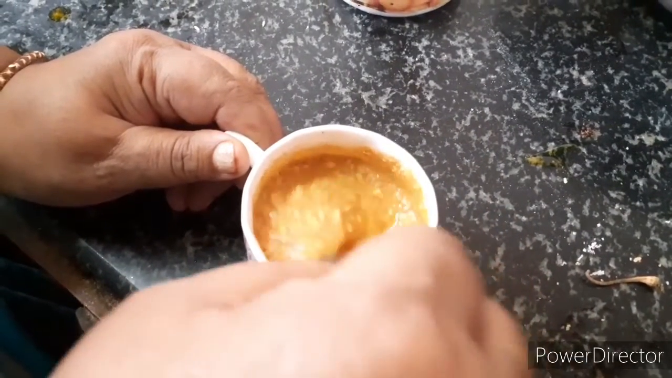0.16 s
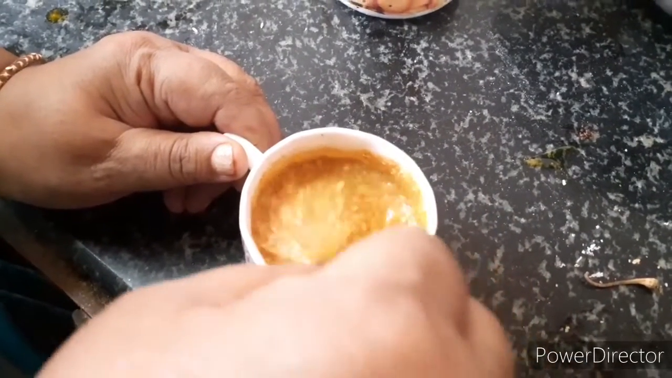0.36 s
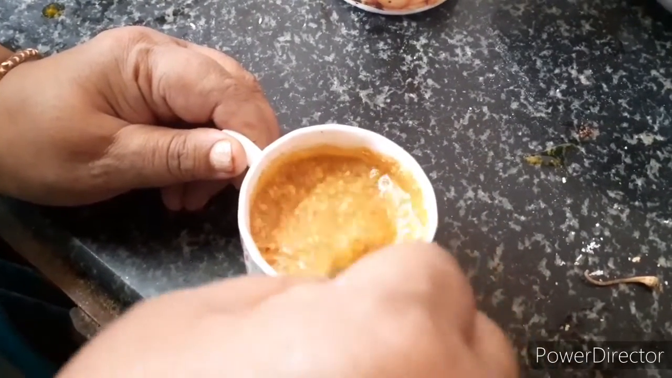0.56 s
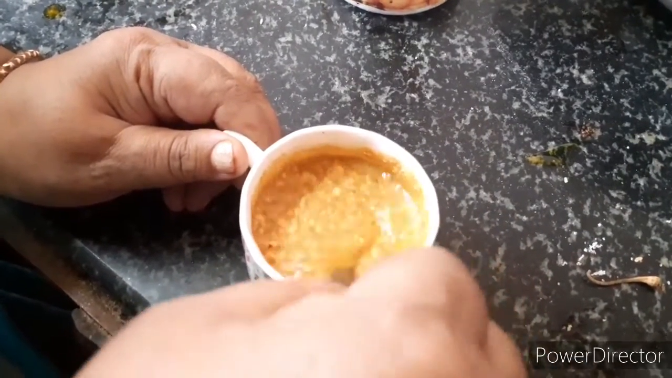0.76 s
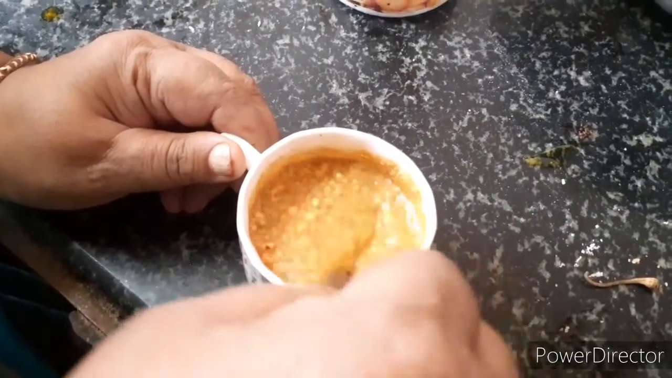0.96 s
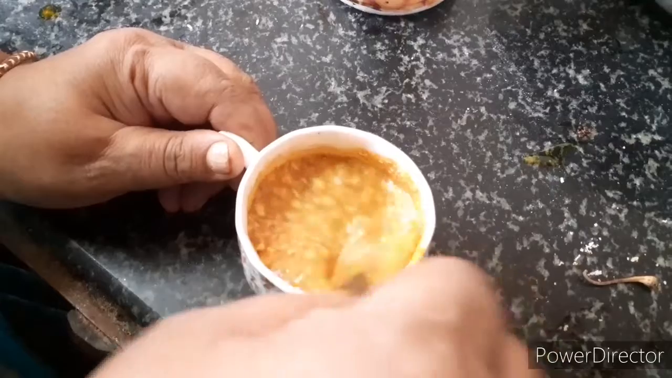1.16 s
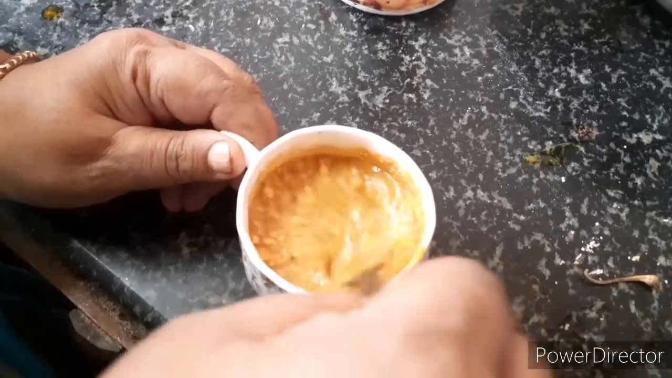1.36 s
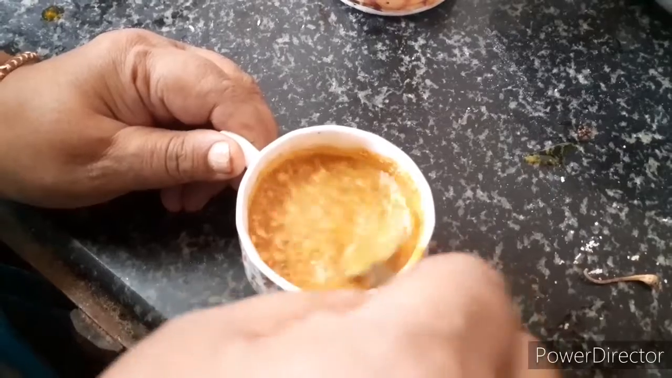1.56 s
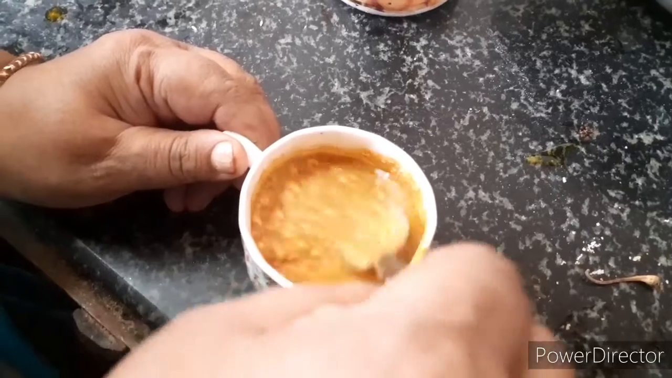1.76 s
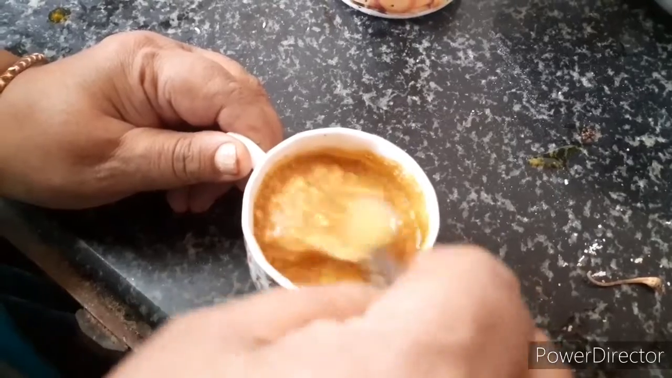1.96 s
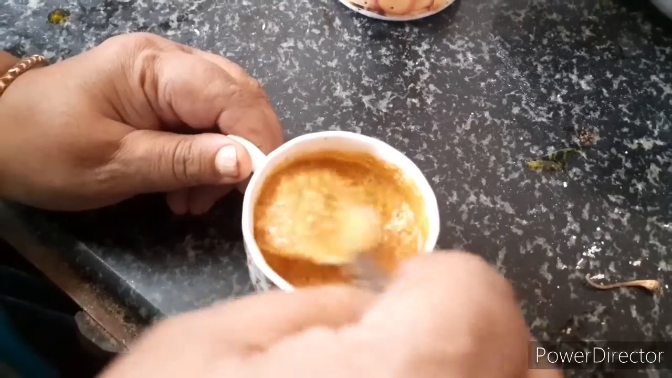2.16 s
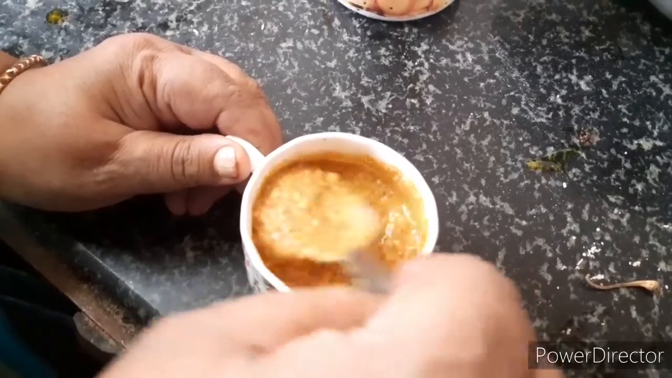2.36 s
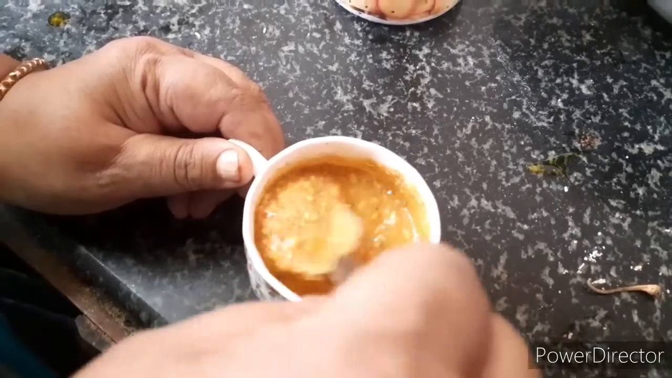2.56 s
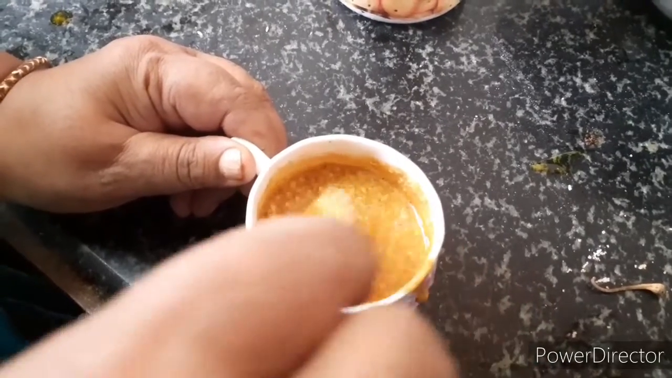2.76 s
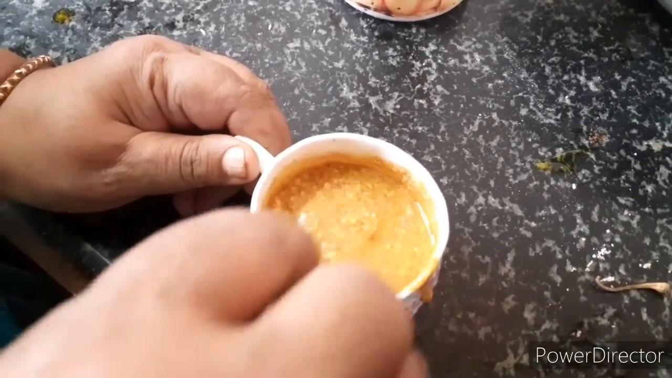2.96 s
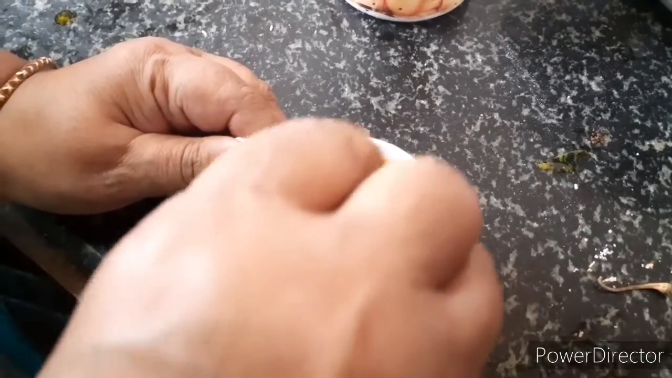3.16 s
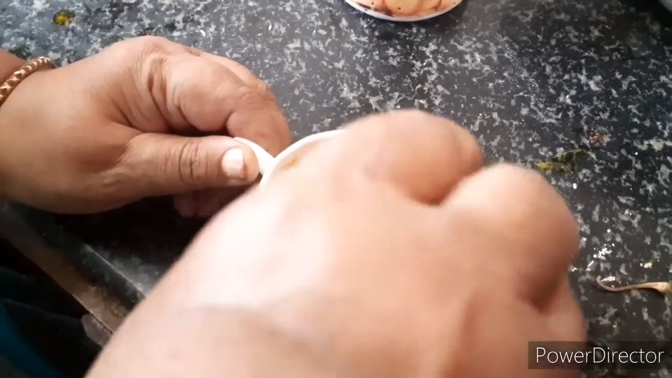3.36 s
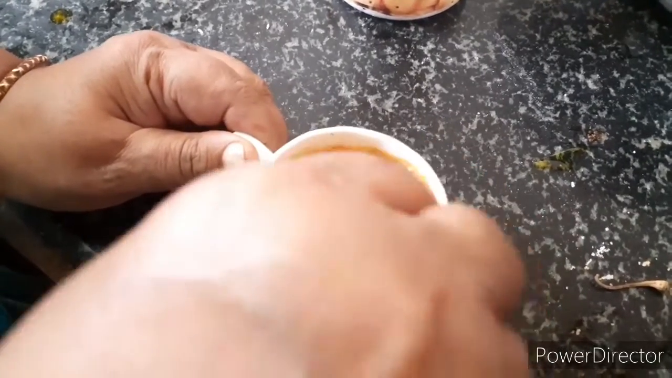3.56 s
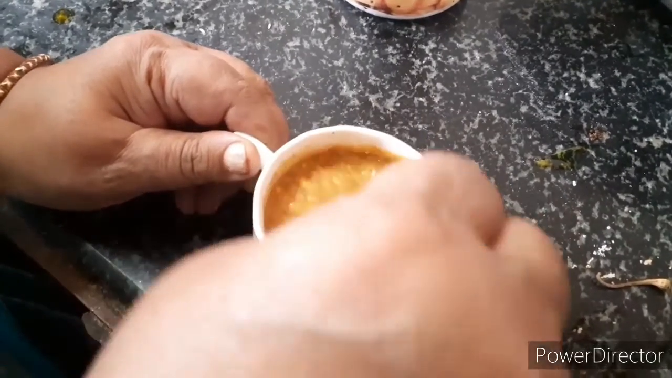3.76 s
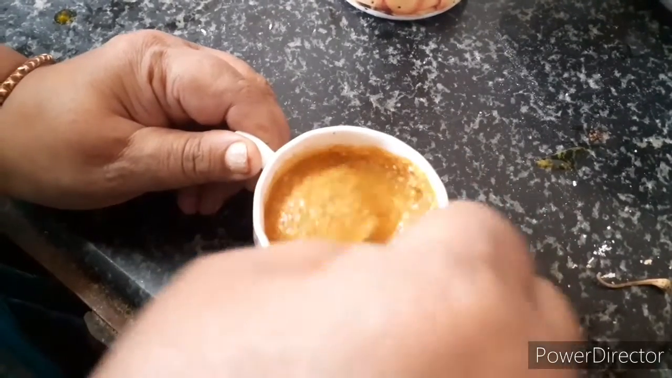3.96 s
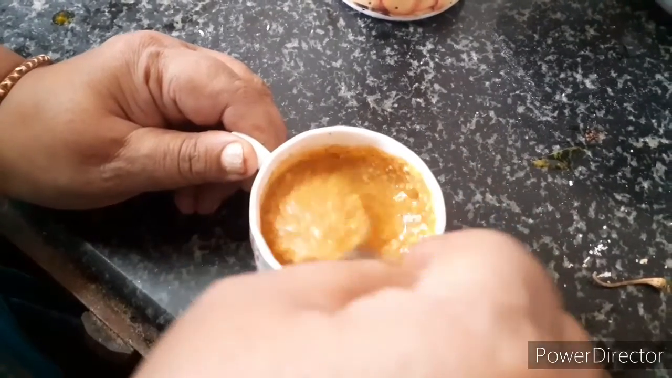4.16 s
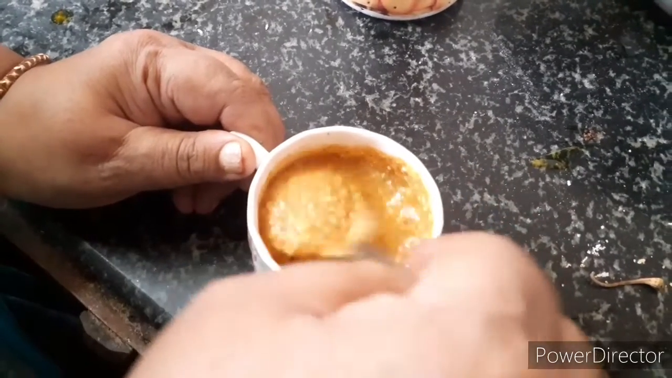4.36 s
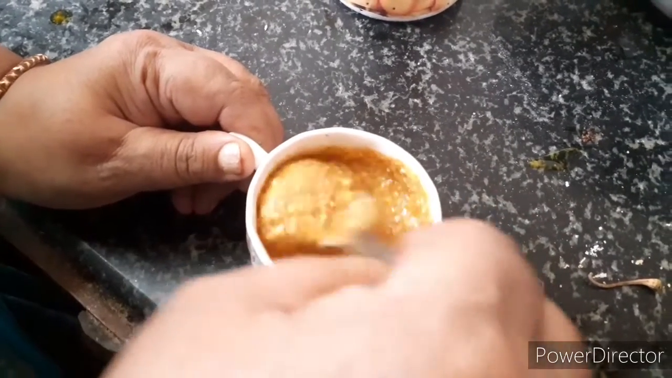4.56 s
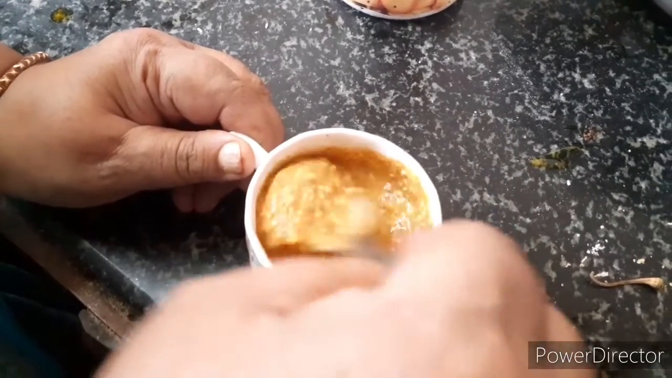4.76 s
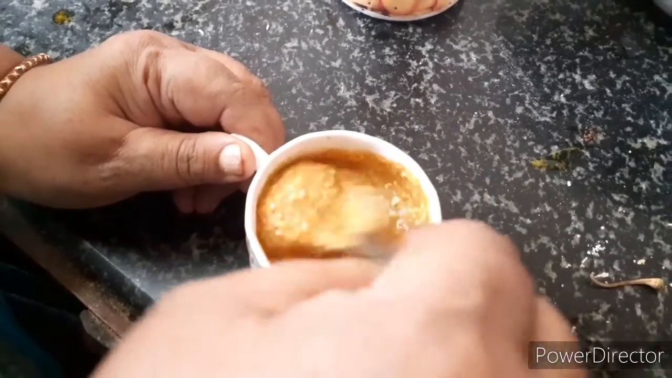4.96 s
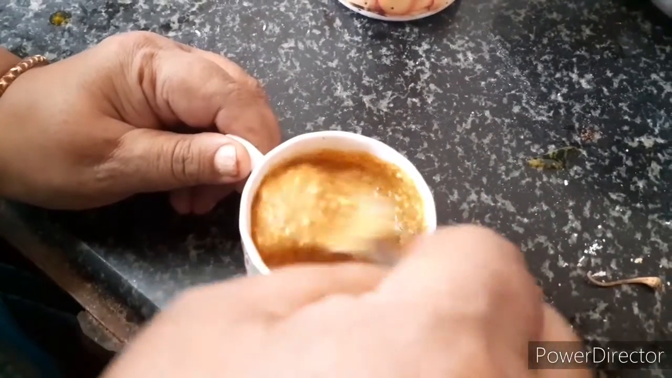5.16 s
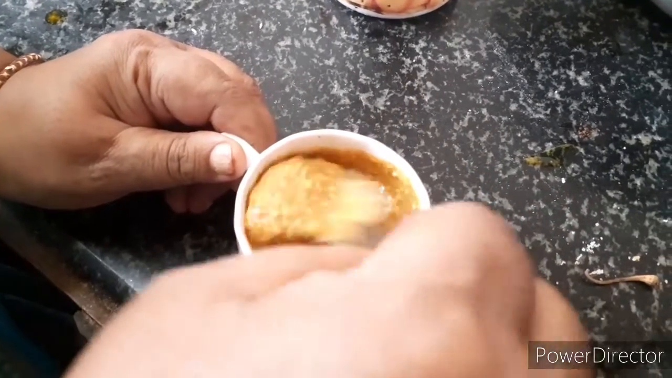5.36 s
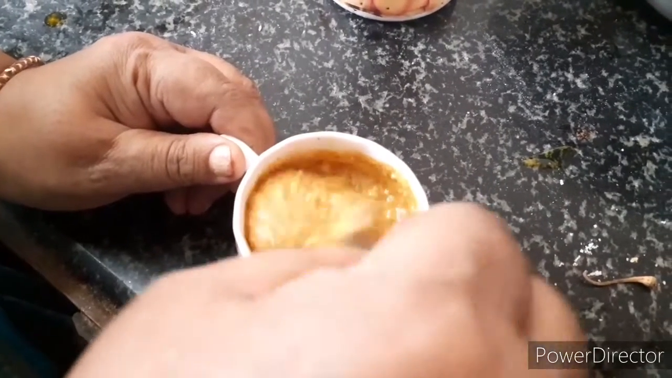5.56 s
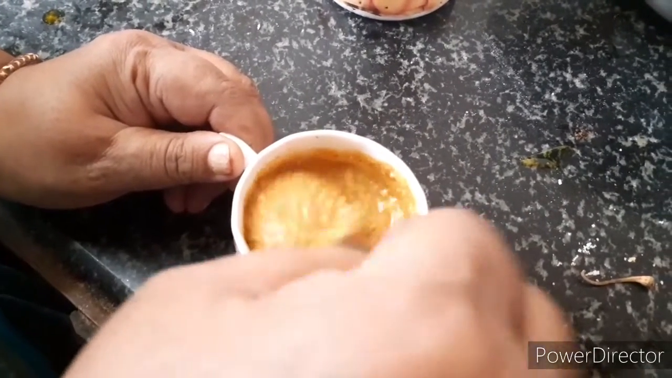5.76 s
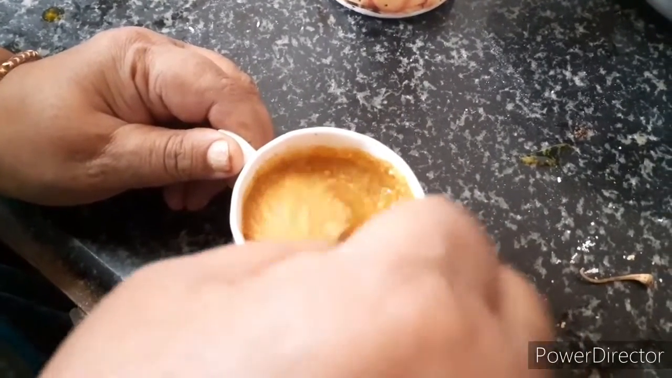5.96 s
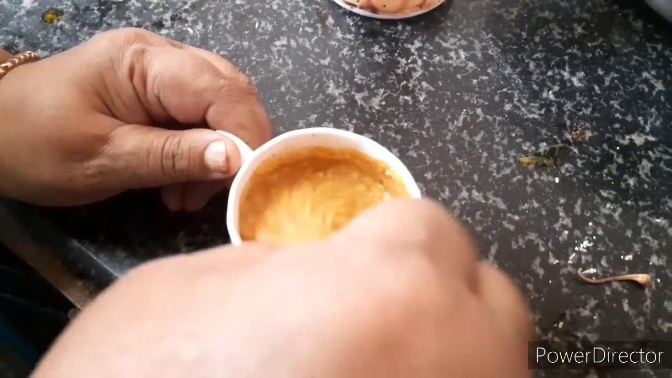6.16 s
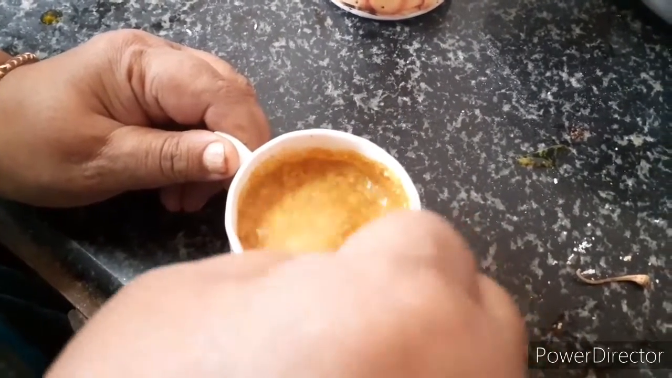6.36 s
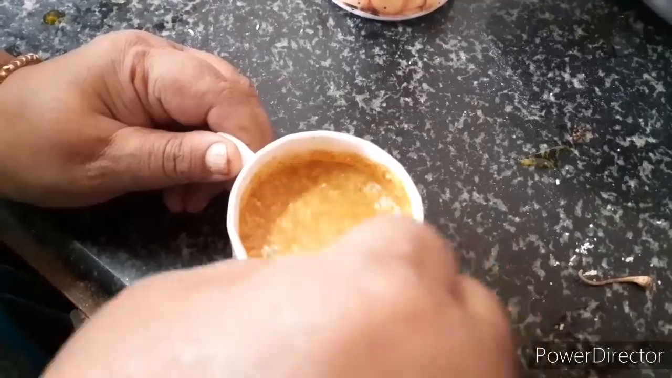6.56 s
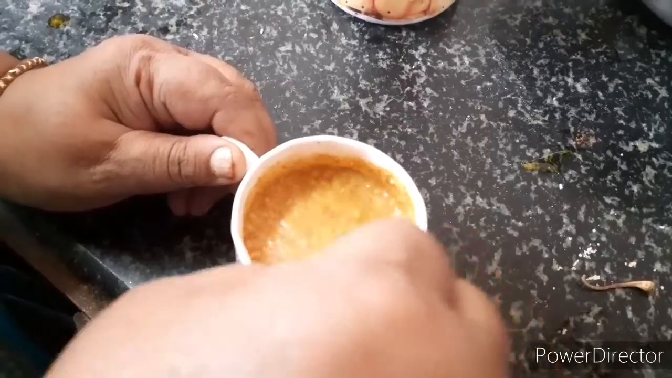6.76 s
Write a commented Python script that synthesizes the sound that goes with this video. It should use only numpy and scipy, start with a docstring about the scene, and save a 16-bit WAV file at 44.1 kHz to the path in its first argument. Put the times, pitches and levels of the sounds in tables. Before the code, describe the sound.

Close stereo phone pickup in a small hard kitchen. A steel spoon stirs thick yogurt in a ceramic cup, giving loud bright clinks almost five times a second, with softer touches and faint gritty slides between. After about two and a half seconds it nearly stops, then a short rub and a flurry of clinks lead back into steady stirring. A low fan drone and soft hiss lie underneath.

```python
"""A fan's drone and a steady hiss come first, then soft touches and bright clinks of a steel spoon in thick yogurt.
The spoon stirs in a ceramic cup on a stone counter. On most turns it lands on the glaze (the cup's ringing modes
and steel crackle), slides (grainy noise) and clinks on the wall (louder modes). Each contact knocks the counter,
whose low modes ring. A small hard kitchen answers with fading noise tails, and a close phone hears it in stereo."""
import sys
import numpy as np
from scipy import signal
from scipy.fft import rfft, irfft, next_fast_len
from scipy.io import wavfile

SR = 44100
rng = np.random.default_rng(int(sys.argv[2]) if len(sys.argv) > 2 else 0)


def to_wav(s):
    """Save 16-bit WAV."""
    ch = np.atleast_2d(s).T  # columns
    pcm = np.round(np.clip(ch, -1, 1) * 32767)  # PCM
    wavfile.write(sys.argv[1], SR, pcm.astype(np.int16))


N = 300321  # length in samples

# Clinks of the spoon on the cup wall:
# start_s, level_db, counter_knock_db, brightness_db_per_octave, favoured_ring_hz
WALL_CLINKS = [(0.0591, -1, -30, -3.5, 2660), (0.255, -3.5, -29.5, -7.5, 2560),
               (0.465, -3.5, -27.5, -3.5, 2640), (0.6955, -4, -31.5, -1.8, 2550),
               (0.9004, -6, -31.5, 0.5, 2600), (1.1053, -3.5, -29.5, -0.5, 2620),
               (1.339, -10.5, -28.5, -5.5, 2570), (1.554, -7, -28, 2.5, 2650), (1.7657, -3, -27.5, 0, 2700),
               (1.982, -2, -28, -6.5, 2600), (2.1992, -0.5, -23.5, -11, 2480), (2.4132, -2, -22, -4, 2380),
               (2.6174, -4.5, -27.5, -2.5, 2420), (3.063, -20.5, -43, 0, 1960),
               (3.735, -15.5, -37, -3, 2270), (3.8855, -4, -38, -3, 2320), (3.9167, -22, -67, 0, 2240),
               (4.0125, -5, -31, -2, 2420), (4.149, -5.5, -39, 2, 2310), (4.22, -1.5, -30, 2.5, 2700),
               (4.286, -18.5, -37, -11, 2420), (4.4212, -5.5, -26.5, 1.5, 2770),
               (4.4767, -19, -40, -1, 2800), (4.6123, -3, -26.5, 1.5, 2640), (4.8063, -6, -25.5, 4, 2760),
               (5.009, -4, -34, 1.5, 2900), (5.2015, -4.5, -24.5, 0, 2530), (5.3991, -2.5, -45, -1, 2520),
               (5.6004, -3, -27, -2, 2430), (5.8076, -3.5, -27, -1.5, 2430),
               (6.0208, -7.5, -30.5, -5.5, 2520), (6.225, -9.5, -30.5, -4, 2830),
               (6.241, -5.5, -31, -3.5, 2440), (6.458, -3, -27.5, -4, 2380),
               (6.6678, -3.5, -26, -1.5, 2460)]
# Landings on the glaze, each followed by a slide up to the next clink:
# start_s, level_db, counter_knock_db, slide_db, brightness_db_per_octave, favoured_ring_hz
GLAZE_LANDINGS = [(0.0187, -23, -34, -34, -12, 2230), (0.2397, -23, -35, -32.5, -6, 2500),
                  (0.4383, -22, -44, -39, 2.5, 2420), (0.649, -18.5, -28.5, -37.5, -12, 2430),
                  (0.893, -28, -46, -32.5, -4, 2700), (1.0916, -20, -44, -37, 2, 2140),
                  (1.3189, -21, -32.5, -33.5, 3, 2550), (1.5242, -21, -34.5, -34.5, 2, 2650),
                  (1.7427, -24, -36, -33.5, 5, 2400), (1.955, -19, -35, -32, 3, 2750),
                  (2.1705, -15.5, -39, -31.5, 5, 2800), (2.371, -17.5, -33, -34.5, 1, 2800),
                  (4.372, -19.5, -27.5, -39.5, 3, 2900), (4.561, -16, -24.5, -40, -1.5, 2150),
                  (4.598, -20, -45, -39, 7, 2600), (4.766, -7, -21, -35.5, -3.5, 1980),
                  (4.9622, -10.5, -22.5, -38.5, -5.5, 2400), (5.1887, -17, -28, -32, -3, 2540),
                  (5.3669, -7.5, -20, -34.5, -17, 2070), (6.008, -18.5, -42, -38.5, 12, 2850),
                  (6.4306, -12.5, -22, -36, -2, 2750), (6.6199, -15.5, -22.5, -44, 0.5, 2300)]


def amp(db):
    """Turn decibels into a plain multiplier."""
    return 10 ** (np.asarray(db) / 20)


def unit(x):
    """Scale a sound to an average (RMS) strength of 1."""
    return x / np.sqrt(np.mean(x ** 2) + 1e-20)


def along(points, hz):
    """Read a curve of (pitch_hz, value) points, with pitch on a log axis."""
    pitch, value = np.transpose(points)
    return np.interp(np.log(hz + 1), np.log(pitch + 1), value)


def filtered(x, response):
    """Filter a sound by multiplying its spectrum with a response that depends on pitch."""
    length = x.shape[-1]
    padded = next_fast_len(length + 8192)
    spectrum = rfft(x, padded) * response(np.fft.rfftfreq(padded, 1 / SR))
    return irfft(spectrum, padded)[..., :length]


def coloured(x, spectrum):
    """Shape a sound with a (pitch_hz, level_db) curve, then even out its strength."""
    return unit(filtered(x, lambda hz: amp(along(spectrum, hz))))


def resonant(modes):
    """A body that rings at several pitches: a response built from (pitch_hz, width_hz, level_db) modes."""
    def response(f):
        total = 0
        for k, (hz, width, db) in enumerate(modes):
            sign = (-1) ** k  # neighbours alternate in sign
            total = total + sign * amp(db) * 1j * f * width / (hz * hz - f * f + 1j * f * width)
        return total
    return response


def ports(balance, lead_s=0):
    """Give the two microphone ports their own colour, and let the left one hear the sound earlier by lead_s."""
    side = np.array([[.5], [-.5]])
    return lambda hz: amp(side * along(balance, hz)) * np.exp(2j * np.pi * hz * side * lead_s)


def add(track, sound, start_s):
    """Mix a sound into a track at a given time."""
    start = round(start_s * SR)
    track[..., start:start + sound.shape[-1]] += sound


def kitchen(sound, gap_s=0.002):
    """Hard walls scatter the sound: a fresh noise tail for each port, each pitch dying at its own speed."""
    # pitch_hz, fade_by_60_db_s, relative_level_db
    room_fade = [(298, 0.2, 4), (890, 0.38, 3), (2530, 0.25, -0.5), (5530, 0.25, -4.5), (8060, 0.21, 3.5),
                 (14100, 0.3, -2.5)]
    hz, t, z = signal.stft(rng.standard_normal((2, SR // 2)), SR, nperseg=256)
    t60 = along([(row[0], row[1]) for row in room_fade], hz)[:, None]
    db = along([(row[0], row[2]) for row in room_fade], hz)[:, None]
    tail = signal.istft(z * amp(db - 60 * t / t60), SR, nperseg=256)[1]
    tail *= 1 - np.exp(-np.arange(tail.shape[1]) / (gap_s * SR))  # the walls answer one after another
    return signal.fftconvolve(sound[None], tail / np.linalg.norm(tail[0]), axes=1)


def air():
    """Hiss and the fan's broad rush are shaped noise; its wavering drones are noise in narrow bands."""
    # pitch_hz, relative_level_db
    hiss_spectrum = [(290, -2), (500, -1.5), (764, -7), (1020, -5.5), (1310, -10.5), (1430, -9.5),
                     (5270, -12.5), (8410, -9), (9880, -16.5), (14900, -11.5), (15800, -30), (16500, -54)]
    # pitch_hz, relative_level_db
    rush_spectrum = [(15, -67), (25, -37), (64, -63), (83, -4.5), (102, 13.5), (125, -10.5), (189, -15),
                     (246, -36), (330, -2.5), (600, -20.5), (780, -57), (1320, -120)]
    # The fan's drones: pitch_hz, width_hz, level_db
    fan_drones = [(102.8, 4.7, -49), (309, 37, -51.5), (366, 24, -53.5)]
    # How alike left and right are: pitch_hz, likeness (1 = the same, 0 = unrelated)
    air_likeness = [(60, 0.54), (240, 0.65), (950, -0.0088), (3770, -0.11), (15000, 0.11)]
    # pitch_hz, left_over_right_db
    air_balance = [(60, -11.5), (150, -1), (380, -3.5), (950, -5.5), (2380, -3), (5980, -5.5),
                   (15000, -3.5)]
    hiss_db, rush_db = -47.5, -48.5

    sound = np.zeros(N)
    for hz, width, db in fan_drones:
        band = resonant([(hz, width, 0)])
        drone = filtered(rng.standard_normal(N), lambda f: band(f) ** 2)
        sound = sound + amp(db) * unit(drone)

    def mid_and_side(spectrum):
        def response(hz):
            turn = np.arccos(np.clip(along(air_likeness, hz), -1, 1)) / 2
            return amp(along(spectrum, hz)) * np.array([np.cos(turn), np.sin(turn)])
        return filtered(rng.standard_normal((2, N)), response)

    for spectrum, db in (hiss_spectrum, hiss_db), (rush_spectrum, rush_db):
        mid, side = mid_and_side(spectrum)
        sound = sound + amp(db) * unit(np.array([mid + side, mid - side]))
    return filtered(sound, ports(air_balance))


def shaking(rise_s=0.0076, t60_s=0.28, knock_db=-12):
    """How hard the slab trembles: the hands' steady work plus a fading shudder after every bump and knock."""
    # The hands shake the counter: time_s, level_db
    hand_shake = [(0.0, -44.5), (0.9, -47), (1.3, -38), (1.45, -44.5), (1.9, -35.5), (2.6, -40),
                  (2.75, -51.5), (4.3, -46), (5.3, -45), (6.81, -53)]
    # The hands bump the counter: start_s, level_db
    hand_bumps = [(1.17, -34), (1.29, -31), (1.66, -27.5), (1.812, -27), (1.868, -27), (1.96, -50),
                  (2.08, -39), (2.53, -50)]
    t = np.arange(N) / SR
    power = amp(np.interp(t, *np.transpose(hand_shake))) ** 2
    knocks = [(row[0], row[2] + knock_db) for row in WALL_CLINKS + GLAZE_LANDINGS]
    for start_s, db in hand_bumps + knocks:
        since = np.maximum(t - start_s, 0)
        shudder = amp(db - 60 * since / t60_s) * np.minimum(1, since / rise_s)
        power = power + shudder ** 2
    return np.sqrt(power)


def counter(push_s=0.00038, lag_s=0.003963, spread_db=1.5):
    """The cup rocks just after each contact and the slab rings low; it also rumbles as the hands work."""
    # The slab's ringing modes: pitch_hz, width_hz, relative_level_db
    slab_modes = [(82, 24, -3), (95.4, 14, 3), (195, 8.7, -13), (298.7, 34, 9.5), (355, 42, 2.5),
                  (407, 30, 0.5), (521, 19.2, 1.5), (682.5, 43, -4), (811, 41, 1), (1190, 165, 2.5)]
    # What the shaken slab hums with: pitch_hz, width_hz, relative_level_db
    tremble_modes = [(101.5, 11.2, 2), (202.7, 24, -8), (344, 30, -10.5)]
    deep_hz, landing_deep_db = 150, 9.5  # a landing pushes down, so its knock is stronger below deep_hz
    t = np.arange(SR // 4) / SR
    push = np.exp(-((t - lag_s) / push_s) ** 2)  # a soft push, poor in treble
    contacts = [(row[0], row[2], 0) for row in WALL_CLINKS]
    contacts += [(row[0], row[2], landing_deep_db) for row in GLAZE_LANDINGS]

    knocks = np.zeros(N + SR)
    for start_s, knock_db, deep_db in contacts:
        modes = []
        for (hz, width, db), chance in zip(slab_modes, rng.standard_normal(len(slab_modes))):
            modes.append((hz, width, db + spread_db * chance + deep_db * (hz < deep_hz)))
        thud = filtered(push, resonant(modes))
        add(knocks, amp(knock_db) * thud / np.abs(thud).max(), start_s)
    knocks = knocks[:N] + amp(-3.5) * kitchen(knocks)[0, :N]
    rumble = shaking() * unit(filtered(rng.standard_normal(N), resonant(tremble_modes)))
    return amp([[-3], [2.5]]) * (knocks + rumble)  # both ports hear it alike, the right one stronger


def sing(ring_hz=3800, t60_s=.7):
    """A thin, slightly unsteady ring of the steel: a fading tone of half a second, begun with some clinks."""
    # start_s, level_db
    hanging_rings = [(0.2549, -47), (0.465, -51), (2.6182, -44.5)]
    track = np.zeros(N + SR)
    t = np.arange(SR // 2) / SR
    for start_s, db in hanging_rings:
        drift = np.cumsum(rng.standard_normal(len(t))) * 0.14  # wandering phase, radians
        tone = np.sin(2 * np.pi * ring_hz * t + drift)
        add(track, amp(db - 60 * t / t60_s) * tone, start_s)
    return track[:N] * amp([[2.5], [-2.5]])


def rub(level_db=-30.5, rise_s=0.0074, hold_s=0.035, t60_s=0.12):
    """The spoon's edge rubs down the wall: noise singing in a few modes swells, holds, then fades."""
    # pitch_hz, width_hz, relative_level_db
    rub_modes = [(1250, 69, -10.5), (2273, 60, 7.5), (3940, 700, -9.5), (5500, 2700, -16.5)]
    t = np.arange(SR // 4) / SR
    fading = np.maximum(t - rise_s - hold_s, 0)
    shape = np.minimum(1, t / rise_s) ** 3 * amp(level_db - 60 * fading / t60_s)
    return shape * unit(filtered(rng.standard_normal(len(t)), resonant(rub_modes)))


def slide(length_s, grit_db=3):
    """Steel dragging over glaze: noise in uneven grains of about a millisecond."""
    # Steel on glaze: pitch_hz, relative_level_db
    glaze_spectrum = [(410, -50), (700, -15.5), (1170, 2), (1700, -20.5), (2300, -1.5), (3650, -0.5),
                      (6370, -2), (9100, -10), (12300, -2), (15000, -12), (16500, -55)]
    n = round(length_s * SR)
    grain_db = grit_db * np.repeat(rng.standard_normal(n // 40 + 1), 40)[:n]
    grains = rng.standard_normal(n) * amp(grain_db)
    return coloured(grains, glaze_spectrum) * np.minimum(1, np.arange(n) / (0.00033 * SR))


def strike(grit_db, groups_db, tilt_db, ring_hz, spread_db=3.5):
    """One blow of peak 1: the cup's modes, weighted by the place struck, plus the crackle of steel on glaze."""
    # The cup's modes, damped by the yogurt: pitch_hz, width_hz, relative_level_db
    cup_modes = [(1440, 960, -19), (2029, 200, -16), (2287, 160, -11), (2615, 203, -13.5),
                 (2920, 344, -5.5), (3328, 906, 5.5), (4145, 314, -8.5), (4656, 526, -1), (5140, 587, -5.5),
                 (5706, 234, -15.5), (7990, 370, -18), (8040, 650, -22.5), (8400, 210, -54)]
    # The contact's own crackle: pitch_hz, relative_level_db
    crackle_spectrum = [(2940, -19), (5000, -16.5), (6480, -53), (8360, -14.5), (9570, -4.5), (11100, -6.5),
                        (12800, 3.5), (15200, -4.5), (16500, -26)]
    # The place struck favours low, middle or upper modes; upper pitch edges of these groups: edge_hz
    group_edges = [2500, 3500, 4900]
    favour_db, favour_octaves = 8, 0.12  # lift of the modes near the favoured ring, and how wide it is
    grit_per_brightness = 0.56  # duller blows crackle less (dB per dB per octave)

    t = np.arange(SR // 8) / SR
    hz, width, db = np.transpose(cup_modes)[:, :, None]
    level_draw, pitch_draw = rng.standard_normal((2, len(cup_modes), 1))
    level = db + spread_db * level_draw
    level += np.append(groups_db, 0)[np.searchsorted(group_edges, hz)]
    level += tilt_db * np.log2(hz / group_edges[1])
    level += favour_db * np.exp(-(np.log2(hz / ring_hz) / favour_octaves) ** 2)
    tones = np.sin(2 * np.pi * hz * (1 + .005 * pitch_draw) * t)
    ring = (amp(level) * np.exp(-np.pi * width * t) * tones).sum(axis=0)
    ring *= 1 - np.exp(-t / 0.0004)  # soft start

    grit_shape = amp(grit_db + grit_per_brightness * tilt_db - 60 * t / 0.0093) * (1 - np.exp(-t / 0.00047))
    grit = grit_shape * coloured(rng.standard_normal(len(t)), crackle_spectrum)
    blow = ring / np.abs(ring).max() + grit
    return blow / np.abs(blow).max()


def nearby(sound, graze_s=0.001011, graze_db=-9, span_s=.006, fall_db=-6, count=5):
    """The tip grazes just before the blow; counter and hands throw quick echoes, different at each port."""
    when, sign = rng.random((2, 2, count))
    taps = np.zeros((2, round((graze_s + span_s) * SR) + 1))
    places = ((graze_s + when * span_s) * SR).astype(int)
    taps[[[0], [1]], places] = np.sign(sign - .5) * amp(fall_db * (1.5 + when))  # later echoes are weaker
    taps[:, 0] = -amp(graze_db)
    taps[:, round(graze_s * SR)] = 1  # the blow itself
    return signal.fftconvolve(sound[None], taps / np.linalg.norm(taps, axis=1, keepdims=True), axes=1)


def spoon():
    """Everything the spoon does to the cup: clinks, landings with slides and one rub, near and in the room."""
    # pitch_hz, left_over_right_db
    cup_balance = [(60, -32), (110, 5), (200, -5.0), (380, -2), (700, -0.5), (1290, -3), (2380, -2.5),
                   (4400, 4.5), (8120, -4), (15000, 7)]
    clink_groups, landing_groups = [-7.5, -2.23, 0.99], [-6.5, -8, -5]  # low, middle, upper modes (dB)
    clink_grit_db, landing_grit_db = -16, -3.5  # crackle, before the effect of brightness
    pan_mean_db, pan_spread_db = 3, 1.5  # clinks lean left
    rub_start_s = 3.725

    near, room = np.zeros((2, 2, N + SR))
    for start_s, db, _, *place in WALL_CLINKS:
        blow = amp(db) * strike(clink_grit_db, clink_groups, *place)
        pan_db = pan_mean_db + pan_spread_db * rng.standard_normal()
        add(near, nearby(blow) * amp(np.array([[.5], [-.5]]) * pan_db), start_s)
        add(room, amp(-3.0) * kitchen(blow), start_s)

    clink_times = np.array([row[0] for row in WALL_CLINKS])
    for start_s, db, _, slide_db, *place in GLAZE_LANDINGS:
        next_clink_s = clink_times[clink_times > start_s][0]
        drag = amp(slide_db) * slide(next_clink_s - start_s)
        drag = np.pad(drag, (0, SR // 8))[:SR // 8]  # as long as a blow
        touch = drag + amp(db) * strike(landing_grit_db, landing_groups, *place)
        add(near, nearby(touch), start_s)
        add(room, amp(0.5) * kitchen(touch), start_s)

    drag = rub()
    add(near, drag, rub_start_s)
    add(room, amp(-0.5) * kitchen(drag), rub_start_s)
    direct = filtered(near[:, :N], ports(cup_balance, lead_s=0.00017))
    return direct + filtered(room[:, :N], ports(cup_balance))


def scene():
    """Add the background, the counter and the spoon together."""
    return air() + counter() + sing() + spoon()


def record(dry, top=.97, hard=6, top_hz=16500):
    """The phone cuts the deep bass, rounds off its loudest peaks and keeps nothing above its band limit."""
    def microphone(hz):
        bass_cut = (1j * hz / (1j * hz + 80)) ** 2
        return bass_cut / np.sqrt(1 + (hz / 15400) ** 40)

    sound = filtered(dry, microphone)
    sound = sound / (1 + np.abs(sound / top) ** hard) ** (1 / hard)
    return filtered(sound, lambda hz: hz < top_hz)


dry = scene()
out = record(dry)
to_wav(out)
```